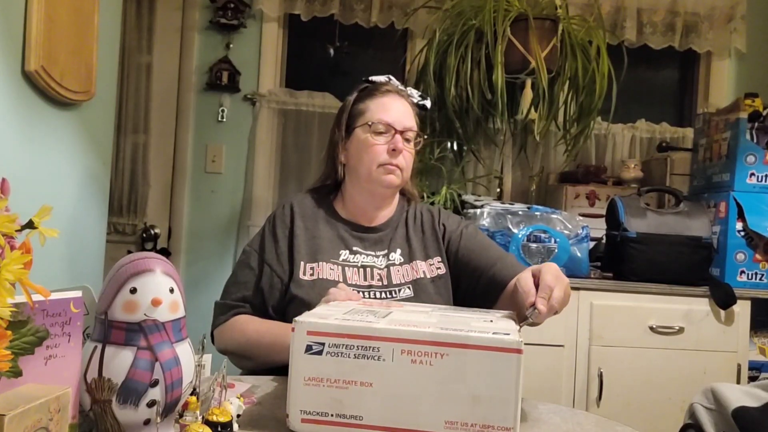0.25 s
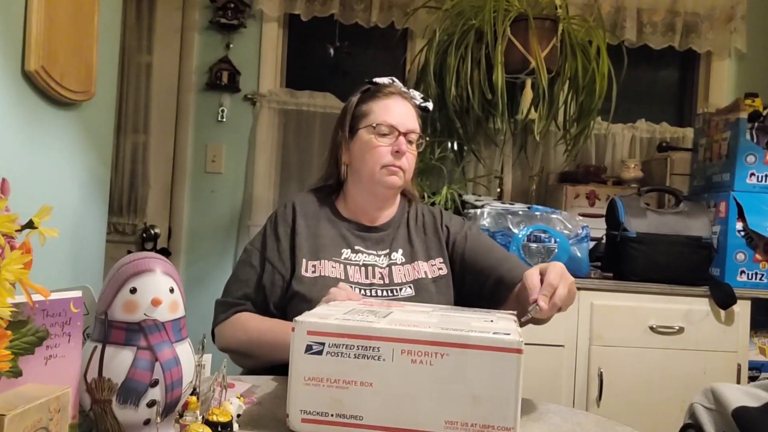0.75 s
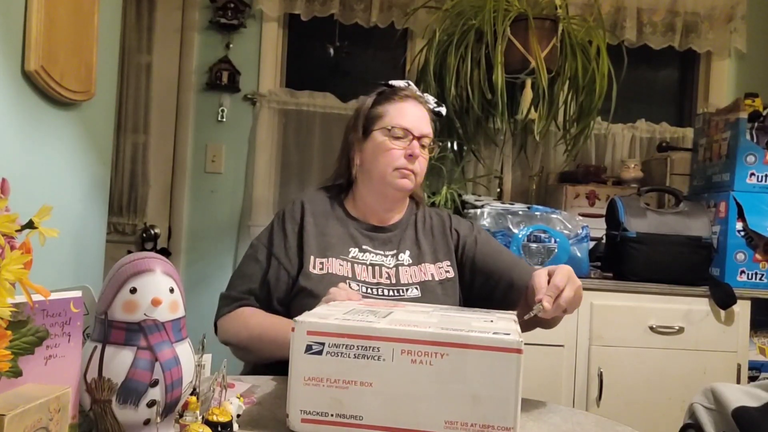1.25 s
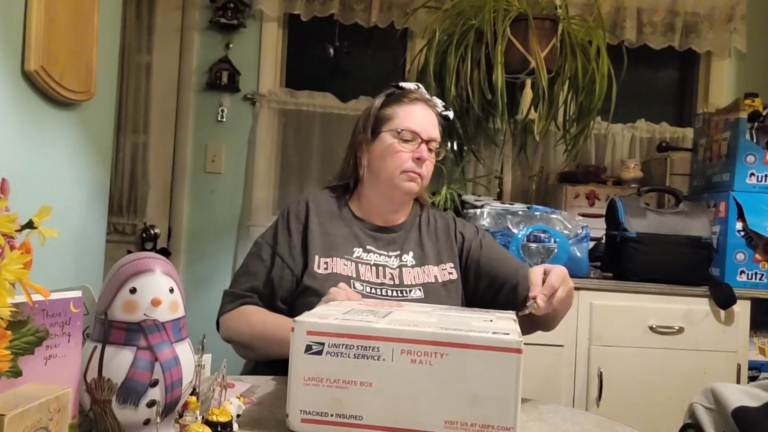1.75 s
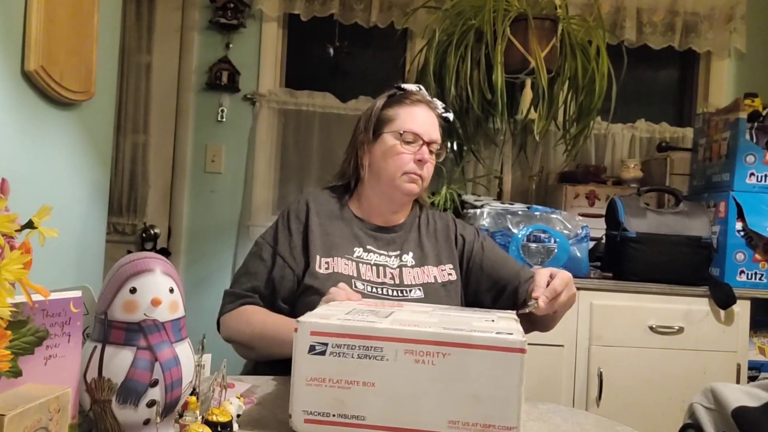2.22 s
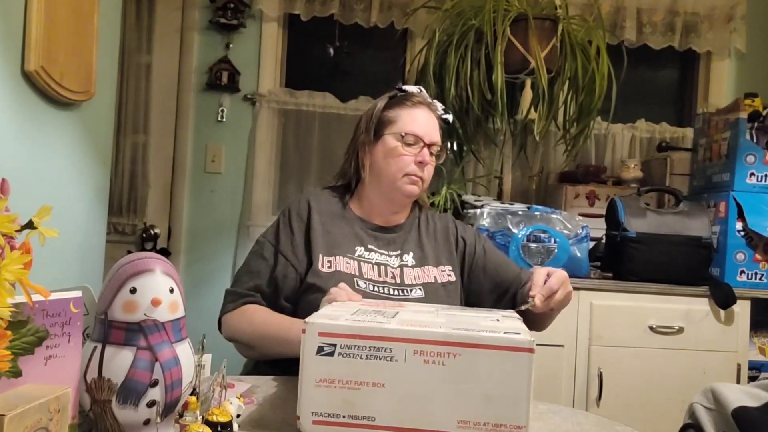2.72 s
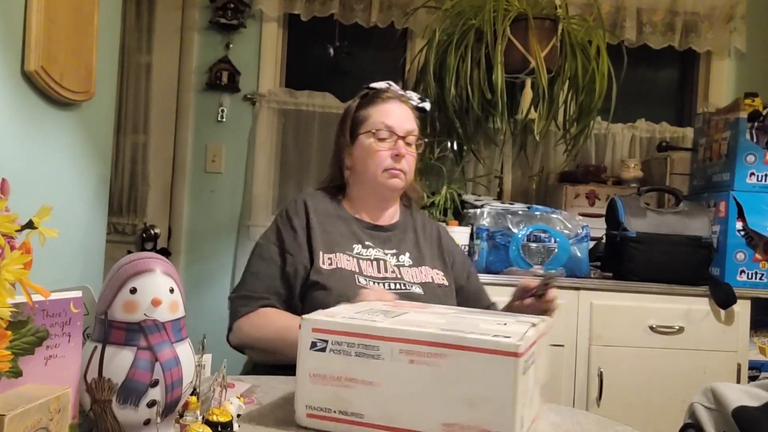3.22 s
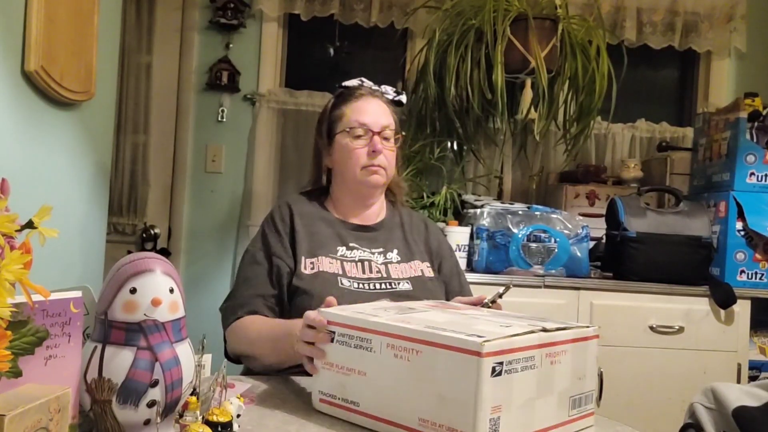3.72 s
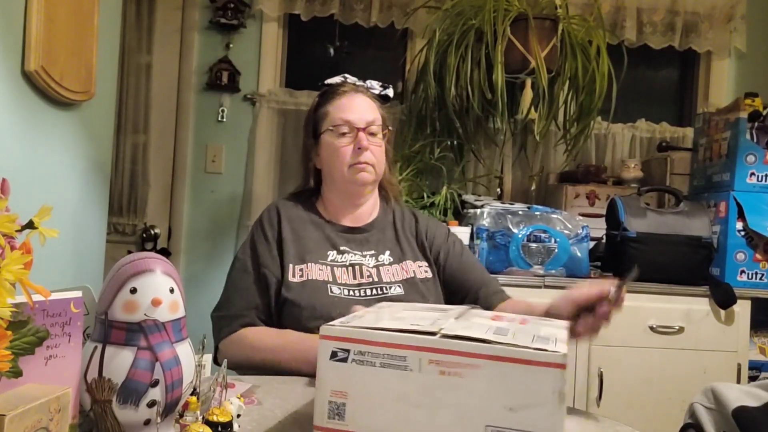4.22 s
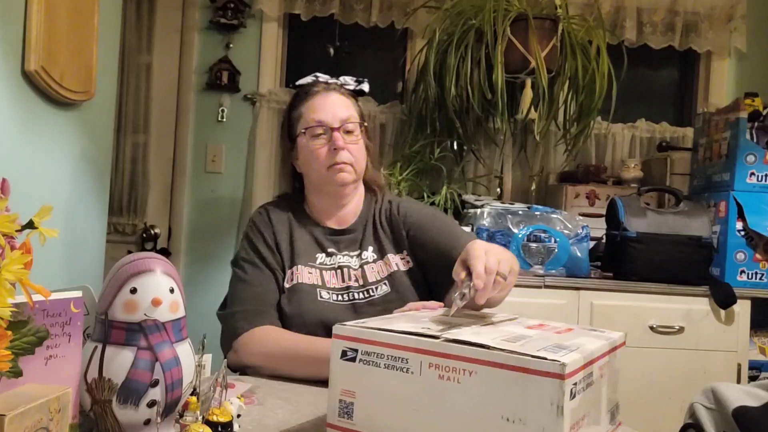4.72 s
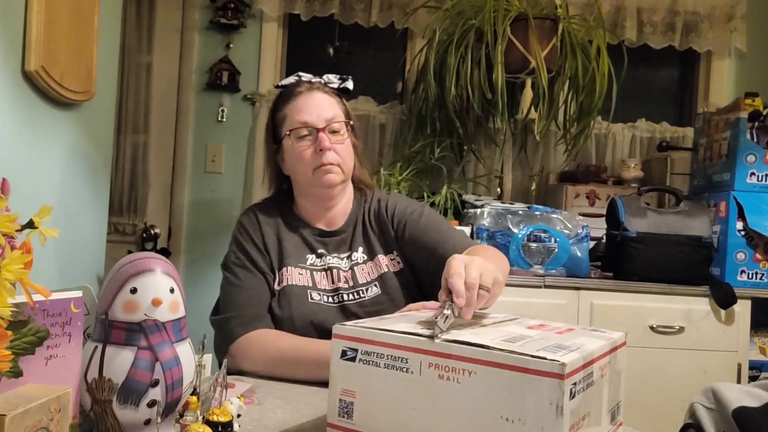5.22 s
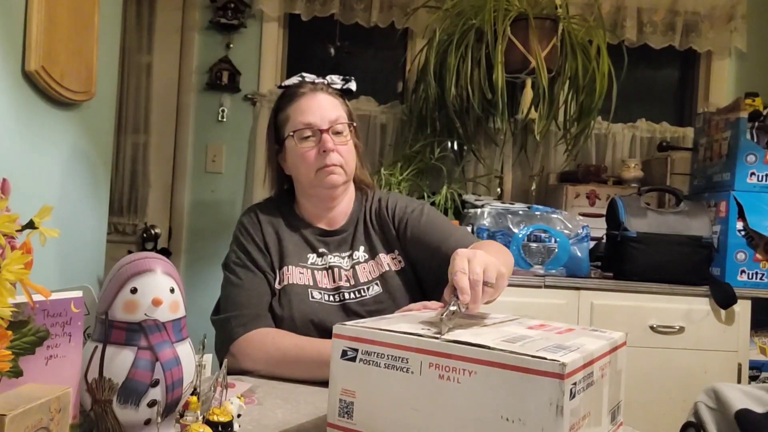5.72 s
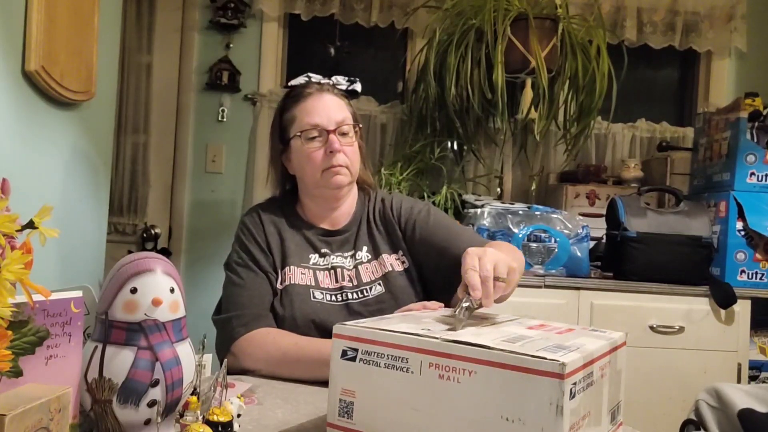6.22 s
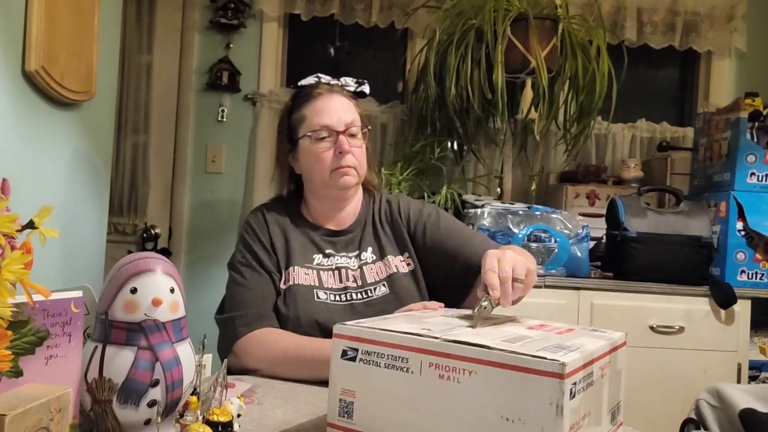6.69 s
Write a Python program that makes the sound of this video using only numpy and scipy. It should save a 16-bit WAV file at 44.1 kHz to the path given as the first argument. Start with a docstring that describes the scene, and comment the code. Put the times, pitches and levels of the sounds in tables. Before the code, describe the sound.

A small blade saws through packing tape on a hollow cardboard box, rasping and popping, then the box is turned and cut again more loudly.

```python
"""At a kitchen table a small blade saws through packing tape on a cardboard box, with a phone close by.
The blade drags, catches and slips over the flutes: noise drives ringing modes of the hollow box and its
board, and a coloured hiss is the tape. Between cuts the box slides on the table as scuffing noise and
knocks down on it as struck modes; a hand rubs a flap as noise around a moving note.
Kitchen echoes and a steady hush surround it, and the phone's suppressor turns quiet moments down."""
import sys
import numpy as np
from scipy import signal
from scipy.fft import rfft, irfft, next_fast_len
from scipy.io import wavfile
from scipy.ndimage import uniform_filter1d

SR = 44100
rng = np.random.default_rng(int(sys.argv[2]) if len(sys.argv) > 2 else 0)


def wav_record(signal):
    """Record a signal, one row per channel, as 16-bit PCM in the file named by sys.argv[1]."""
    frames = np.transpose(np.atleast_2d(signal))
    bounded = np.clip(frames, -1, 1)
    # unit amplitude maps onto the largest positive 16-bit level
    quanta = np.round(bounded * 32767).astype(np.int16)
    wavfile.write(sys.argv[1], SR, quanta)


N = 306495
T = np.arange(N) / SR
PAD = next_fast_len(N + SR)  # transform length, with room for tails
HZ = np.maximum(np.fft.rfftfreq(PAD, 1 / SR), 1)

# Modes of the air in the box: pitch_hz, width_hz, level_db
AIR_MODES = [(107.6, 24, -3), (128.8, 8.7, 15.5), (170, 64, -13)]
# Modes of the side walls: pitch_hz, width_hz, level_db
WALL_MODES = [(272.2, 21.9, 4), (297, 33.3, -2), (332.6, 33, -2.5), (396, 28.3, -3.5), (416, 36.6, -6.5),
              (472, 43, -11), (536.4, 35, -10.5), (647, 17, -12)]
# Modes of the board's flaps, low to high: pitch_hz, width_hz, level_db
BOARD_MODES = [(736, 113, 3), (856, 58, 7.5), (1080, 370, 3.5), (1150, 52, 7.5), (1224, 32, -1),
               (1342, 40, 7), (1437, 57, 4), (1766, 280, 0), (1970, 204, 1.5), (2212, 41, 0.5),
               (2360, 59, -2), (2548, 83, -2), (2850, 275, -6), (3415, 110, -5), (3635, 49, -1),
               (3920, 270, -6.5), (4680, 470, -10)]
# Mode of the table top: pitch_hz, width_hz, level_db
TABLE_MODES = [(64, 31, 0)]
# Spectrum of the tape hiss: pitch_hz, relative density (dB per Hz)
TAPE_COLOUR = [(2350, -20), (4000, -7), (4440, -5), (4790, -10.5), (5310, -3.5), (7660, -0.5), (9170, -7),
               (15100, 0.5), (16000, -48)]

CREST_DB = 5  # peak of a noise burst over its rms
MID_ONLY = np.array([[1], [0]])


def undb(db):
    """Turn dB into gain."""
    return 10 ** (np.asarray(db) / 20)


def through(x, response):
    """Filter x with a response scaled so that unit white noise keeps rms 1."""
    scale = np.sqrt(np.mean(abs(response) ** 2))
    return irfft(rfft(x, PAD) * response / scale, PAD)[..., :N]


def modes(table, neighbour=-1):
    """Sum ringing resonances; each is multiplied by neighbour once more than the one before."""
    response = 0
    for k, (hz, width_hz, db) in enumerate(table):
        resonance = 1 / (1 + 1j * (HZ - hz ** 2 / HZ) / width_hz)
        response = response + neighbour ** k * undb(db) * resonance
    return response


def colour(table):
    """Draw a spectrum through (Hz, dB) points, straight over log frequency."""
    hz, db = np.transpose(table)
    return undb(np.interp(np.log(HZ), np.log(hz), db))


def gains(tables):
    """Draw each column's dB as a gain over time, silent outside the tables."""
    out = 0
    for table in tables:
        s, *columns = np.transpose(table)
        out = out + np.array([undb(np.interp(T, s, db, left=-200, right=-200)) for db in columns])
    return out


def stroke(s, length_s, rise_s, t60_s):
    """Rise softly at s, hold for the length, then fade exponentially."""
    t = np.maximum(T - s, 0)
    rise = (1 - np.exp(-t / rise_s)) ** 2
    return rise * np.exp(-np.log(1000) * np.maximum(t - length_s, 0) / t60_s)


def burst(s, t60_s, rise_s):
    """Rise softly at s against an exponential fade that starts at once."""
    return stroke(s, 0, rise_s, t60_s)


def grit(scatter_db, grain_s):
    """Make mid and side noise that share uneven grains, as fibres and glue let go; rms 1."""
    k = max(int(grain_s * SR), 1)
    size = undb(scatter_db * np.repeat(rng.standard_normal(N // k + 1), k)[:N])
    size = uniform_filter1d(size, k)
    return rng.standard_normal((2, N)) * size / np.sqrt(np.mean(size ** 2))


def struck(pushes, table, neighbour=1):
    """Ring the modes after soft half-wave pushes (s, contact s, peak dB)."""
    size = SR // 3
    response = irfft(modes(table, neighbour), PAD)[:size]
    out = np.zeros(N + size)
    for s, contact_s, db in pushes:
        push = np.sin(np.pi * np.clip(T[:SR // 100] / contact_s, 0, 1)) ** 2
        ring = signal.fftconvolve(response, push)[:size]
        at = int(s * SR)
        out[at:at + size] += undb(db) * ring / abs(ring).max()
    return out[:N]


def patchy(x, spread_db, hold_s):
    """Swell narrow bands apart, as each bit of tape and board rings differently."""
    octaves, spectrum, out = np.log2(HZ), rfft(x, PAD), x
    k = int(hold_s * SR)
    for centre in np.arange(9.5, 13.3, 1 / 8):  # eighths of an octave
        band = irfft(spectrum * np.clip(1 - 8 * abs(octaves - centre), 0, 1), PAD)[:, :N]
        wander = np.repeat(rng.standard_normal(N // k + 1), k)[:N]
        swell = undb(spread_db * uniform_filter1d(wander, k))
        out = out + band * (swell - 1)
    return out


def hush():
    """Lay a steady coloured noise under the scene."""
    # Spectrum of the hush: pitch_hz, relative density (dB per Hz)
    hush_colour = [(24, -11), (40, 14.5), (185, 0), (297, 5.5), (392, -1.5), (585, -4), (1550, -9.5),
                   (7730, -10), (16000, -11)]
    return undb(-67.5) * through(rng.standard_normal((2, N)), colour(hush_colour))


def blade():
    """Drag and slip over the flutes, shaking the box's air, walls and flaps, the table and the tape."""
    # Strokes: start_s, length_s, rise_s, flap rasp level_db, change over the stroke (dB), then
    # table rumble, air boom, wall drum, cut edge and tape hiss (all dB re rasp)
    strokes = [(0.0, 1.05, 0.0062, -64.5, 2.5, 4.5, 6, 2.9, -3.5, 0.5),
               (1.132, .15, 0.0095, -59, 2.5, -4, 0.5, 6, -22, 2),
               (1.362, .14, 0.024, -56.5, -4.5, 2, 6, 5.3, -21, -3.5),
               (1.495, .36, 0.0065, -61, 8, -0.5, 5.5, 7.2, -16, -3),
               (1.987, 0.14, 0.0083, -55, -8.5, 8.5, 4.5, 10, -14, -2),
               (2.358, 0.13, 0.049, -67.5, -12, 22.5, 10, 27, 3, 15),
               (2.448, .22, 0.0037, -52.5, -1.5, -6, -2, 8.5, -3, -5.5),
               (2.72, 0.028, 0.005, -55.5, -1, 0, 17.5, 9.5, -8, -2.5),
               (5.541, 0.14, 0.0075, -61, 5.5, -21, -9.5, 6, 3.5, 1.5),
               (5.658, 0.741, 0.0055, -47, 0, -13.5, -1.5, 2.0, -15.5, -5),
               (6.416, .52, 0.0074, -47.5, -1, -12.5, -2.5, 3.9, -12, -6)]
    # Hand pressure, shaping the long cuts: time_s, level_db
    pressure_points = [(2.49, 0.5), (2.58, 6.5), (2.68, 1), (5.67, -1.5), (5.8, -1), (5.974, 3.5),
                       (6.11, -3), (6.298, -3.5), (6.34, 1.5), (6.416, -3.5), (6.444, -1), (6.6, -2),
                       (6.866, 1.5), (6.95, 5)]
    # Lurches of the box under the hand: centre_s, air boom level_db, wall drum level_db, half_length_s
    lurches = [(0.262, -50, -69, 0.092), (0.432, -47, -50.5, 0.06), (0.806, -42, -67, 0.024),
               (1.531, -38, -44.5, 0.013), (1.935, -37.5, -42.5, 0.023), (2.469, -34, -36.5, 0.015),
               (2.545, -58, -37.5, 0.039), (2.642, -48, -46, .02), (2.89, -39, -51.5, 0.032),
               (5.812, -34, -33.5, 0.017), (5.976, -38, -60, 0.034), (6.171, -39, -40.5, 0.031),
               (6.338, -59, -35.5, 0.033), (6.377, -49, -36, 0.014), (6.459, -63, -35.5, 0.033),
               (6.537, -52, -41, 0.071), (6.918, -37.5, -42, 0.04)]
    # Slips over a flute: time_s, tape hiss peak_db, wall drum level_db
    slips = [(0.0024, -36.5, -31), (0.073, -37.5, -36), (0.143, -36.5, -34), (0.208, -36.5, -34.5),
             (0.27, -34.5, -33.5), (0.334, -36, -37), (0.3954, -37, -35.5), (0.465, -36, -55),
             (0.516, -35, -30.5), (0.571, -37, -30), (0.637, -35.5, -38), (0.701, -37, -32),
             (0.762, -37, -36.5), (0.834, -36, -29), (0.906, -35, -37), (0.96, -34, -30), (1.025, -38, -33),
             (1.1727, -41.5, -58), (1.26, -41.5, -47), (1.528, -35, -30), (1.615, -40.5, -35),
             (1.703, -40.5, -27), (1.775, -41, -31.5), (1.8214, -37.5, -35), (2.046, -39.5, -51),
             (2.089, -43, -35.5), (2.455, -32.5, -26), (5.567, -38, -42), (5.745, -37, -26.5),
             (6.3225, -42, -39), (6.4457, -45, -40), (6.651, -37, -22.5)]
    stroke_t60_s, slip_t60_s, slip_rise_s = 0.21, 0.095, .007
    slip_lead_s = 0.0066  # the walls load up before the blade slips
    slip_rasp_db, slip_edge_db = -5, -2  # flap rasp re hiss peak; stiff cut edge re that rasp

    table = boom = drum = rasp = hiss = edge = slip_edge = slip_rasp = 0
    pressure = undb(np.interp(T, *np.transpose(pressure_points), left=0))
    for s, length_s, rise_s, rasp_db, change_db, table_db, boom_db, drum_db, edge_db, hiss_db in strokes:
        progress = np.clip((T - s) / length_s, 0, 1)
        drag = undb(rasp_db + change_db * progress) * pressure
        drag = drag * stroke(s, length_s, rise_s, stroke_t60_s)
        table = table + undb(table_db) * drag
        boom = boom + undb(boom_db) * drag
        drum = drum + undb(drum_db) * drag
        edge = edge + undb(edge_db) * drag
        rasp = rasp + drag
        hiss = hiss + undb(hiss_db) * drag
    for s, boom_db, drum_db, half_s in lurches:
        swell = np.exp(-((T - s) / half_s) ** 2)
        boom = np.hypot(boom, undb(boom_db) * swell)
        drum = np.hypot(drum, undb(drum_db) * swell)
    for s, hiss_db, drum_db in slips:
        push = burst(s - slip_rise_s, slip_t60_s, slip_rise_s)
        early_push = np.roll(push, -int(slip_lead_s * SR))
        drum = np.hypot(drum, undb(drum_db) * early_push)
        hiss = np.hypot(hiss, undb(hiss_db - CREST_DB) * push)
        slip_rasp = slip_rasp + undb(hiss_db + slip_rasp_db) * push
        slip_edge = slip_edge + undb(hiss_db + slip_rasp_db + slip_edge_db) * push

    box = through(boom * grit(1.2, 0.0032), modes(AIR_MODES))
    box = box + through(drum * grit(2.25, .004), modes(WALL_MODES))
    box = box + through(table * grit(0.63, 0.0092), modes(TABLE_MODES))
    # The stiff cut edge rings the top modes of the board.
    board = through(rasp * grit(3.1, .003), modes(BOARD_MODES))
    board = board + through(edge * grit(1.3, 0.0057), modes(BOARD_MODES[-7:]))
    board = board + through(slip_edge * grit(1.4, 0.0079), modes(BOARD_MODES[-5:]))
    board = board + through(slip_rasp * grit(1.7, .003), modes(BOARD_MODES[:8]))
    tape = through(hiss * grit(2.0, 0.0027), colour(TAPE_COLOUR))
    return box + patchy(board + tape, 2.87, .035)


def catches():
    """Catch on a flute and jerk free: each jerk rings the walls and crackles in the flaps."""
    # Jerks: time_s, wall peak_db, crackle level_db
    jerks = [(1.786, -37, -49), (1.824, -37, -56), (2.463, -33, -58), (5.745, -35.5, -53),
             (5.862, -26.5, -57), (5.951, -29.5, -44), (6.121, -32, -53), (6.389, -27, -43),
             (6.458, -31, -46), (6.482, -31.5, -51), (6.545, -40, -39)]
    contact_s, t60_s = .001, 0.054
    ring = struck([(s, contact_s, wall_db) for s, wall_db, _ in jerks], WALL_MODES)
    crackle = sum(undb(db) * burst(s, t60_s, .0007) for s, _, db in jerks)
    return ring * MID_ONLY + through(crackle * grit(3.0, 0.0014), modes(BOARD_MODES))


def knocks():
    """Knock the box on the table: edge cracks and scuffs, then the body rings air, walls and table."""
    # Knocks, last the blade's stab: time_s, air boom peak_db, wall level_db (its peak is CREST_DB higher),
    # crack level_db, corner peak_db, scuff level_db, body contact_s
    knock_table = [(1.936, -33.5, -58, -50, -60, -56.5, 0.0019), (2, -39, -39.5, -53, -60, -69, 0.0018),
                   (2.888, -28, -42, -48.5, -67.5, -49.5, 0.002),
                   (3.709, -42.5, -34, -56, -39, -49, 0.0019), (3.749, -49, -44, -64, -65, -67, 0.002),
                   (4.477, -49, -45, -78, -65, -62, 0.0053), (5.678, -44, -28, -41.5, -55, -36.5, 0.0008)]
    # Mode of a stiff corner that clacks: pitch_hz, width_hz, level_db
    corner_modes = [(1674, 120, 0)]
    body_lag_s = 0.00198  # the body lands just after the edge
    table_db = -3  # table top re air boom
    s, boom_db, wall_db, crack_db, corner_db, scuff_db, contact_s = np.transpose(knock_table)
    body = s + body_lag_s
    ring = struck(zip(body, contact_s, boom_db), AIR_MODES, -1.2)
    ring = ring + struck(zip(body, contact_s, wall_db + CREST_DB), WALL_MODES)
    ring = ring + struck(zip(s, contact_s / 5, crack_db + CREST_DB), BOARD_MODES)
    ring = ring + struck(zip(body, contact_s / 8, corner_db), corner_modes)
    ring = ring + struck(zip(body, contact_s, boom_db + table_db), TABLE_MODES)
    crack = sum(undb(db) * burst(at, 0.21, c / 2) for at, db, c in zip(s, crack_db, contact_s))
    scuff = sum(undb(db) * burst(at, 0.17, c / 8) for at, db, c in zip(s, scuff_db, contact_s))
    crack = through(crack * grit(3.0, 0.0036), modes(BOARD_MODES))
    scuff = through(scuff * grit(1.0, 0.003), colour(TAPE_COLOUR))
    return ring * MID_ONLY + crack + scuff


def sliding():
    """Rub the box's bottom on the table: judders, rustling flaps, a scuff and finer hiss, small ticks."""
    # Slides, one table each: time_s, scuff level_db, bright hiss (dB re scuff)
    slides = [
        [(3.03, -86, 8), (3.096, -61, -0.5), (3.314, -56, 2.5), (3.442, -56, -1), (3.534, -72, -24),
         (3.68, -88, -7)],
        [(3.76, -73, 8), (3.828, -64, 0.5), (3.99, -58, 5.5), (4.19, -60.5, 4.5), (4.328, -60, -3),
         (4.36, -60, 4.5), (4.438, -69, -14), (4.476, -60.5, -1), (4.646, -64.5, -1), (4.854, -62, -4),
         (4.976, -67.5, 2), (5.22, -68, -10), (5.36, -83, -5)],
    ]
    # Judders as the bottom catches: start_s, length_s, then level_db of table rumble, air boom,
    # wall drum and flap rustle
    judders = [(2.901, 0.13, -66, -52, -63, -97), (3.324, 0.15, -72, -76, -65, -71.5),
               (3.717, 0.086, -49.5, -54, -57, -66), (4.086, 0.21, -73, -72, -65.5, -71.5),
               (4.317, 0.066, -67, -62, -57, -69), (4.447, 0.031, -51, -62, -54.5, -65),
               (4.503, 0.028, -55, -62, -67, -85), (4.747, 0.16, -83, -74, -69.5, -68),
               (4.838, .01, -81, -75, -77, -65), (4.939, 0.034, -63, -59, -60, -75),
               (5.005, 0.033, -57, -69, -73, -67), (5.052, 0.19, -84, -75, -72, -68),
               (5.44, 0.028, -89, -69, -64.5, -67)]
    # Ticks of tape and blade: time_s, scuff peak_db, bright hiss level_db, fade t60_s, rise_s
    ticks = [(3.767, -46.5, -46, 0.14, 0.0032), (4.162, -42.5, -47, 0.29, 0.0035),
             (4.657, -54, -51.5, 0.41, 0.0019), (4.856, -52.5, -58.5, 0.27, .001),
             (5.135, -48.5, -53, 0.13, .002), (5.463, -48, -49, 0.12, 0.0004),
             (5.667, -37, -40, 0.03, 0.00099)]
    # Spectrum of the scuff and its hiss: pitch_hz, relative density (dB per Hz)
    scuff_colour = [(710, -64), (1200, -2), (2620, 3), (5020, 4), (5410, 2.5), (5840, 2.5), (7570, 3),
                    (8820, -9.5), (14800, -3.5), (16000, -11)]
    judder_rise_s, judder_t60_s = 0.0066, 0.14
    bright_hz, rustle_hz = 8000, 980  # scuff gives way to bright hiss; the rustle is duller above

    louder = [[(s, db, db + more_db) for s, db, more_db in slide] for slide in slides]
    scuff, bright = gains(louder)
    table = boom = drum = rustle = 0
    for s, length_s, table_db, boom_db, drum_db, rustle_db in judders:
        judder = stroke(s, length_s, judder_rise_s, judder_t60_s)
        table = table + undb(table_db) * judder
        boom = boom + undb(boom_db) * judder
        drum = drum + undb(drum_db) * judder
        rustle = rustle + undb(rustle_db) * judder
    for s, scuff_db, bright_db, t60_s, rise_s in ticks:
        tick = burst(s - rise_s, t60_s, rise_s)
        scuff = np.hypot(scuff, undb(scuff_db - CREST_DB) * tick)
        bright = np.hypot(bright, undb(bright_db) * tick)

    box = through(drum * grit(5.0, 0.0059), modes(AIR_MODES[-1:] + WALL_MODES))
    box = box + through(boom * grit(2.2, 0.0052), modes(AIR_MODES))
    dull_flaps = modes(WALL_MODES[-2:] + BOARD_MODES) / (1 + (HZ / rustle_hz) ** 4)
    box = box + through(rustle * grit(1.3, 0.0038), dull_flaps)
    box = box + through(table * grit(1.0, 0.005), modes(TABLE_MODES))
    bright_share = 1 / (1 + (bright_hz / HZ) ** 8)
    rub = through(scuff * grit(0.44, 0.0021), colour(scuff_colour) * (1 - bright_share))
    return box + rub + through(bright * grit(1.5, 0.0012), colour(scuff_colour) * bright_share)


def finest_hiss():
    """Swell the very top of the hiss once, as noise above a steep low cut."""
    centre_s, half_s, level_db, low_cut_hz = 4.01, .07, -56, 13000
    swell = undb(level_db) * np.exp(-((T - centre_s) / half_s) ** 2)
    return through(swell * grit(1.5, .001), 1 / (1 + (low_cut_hz / HZ) ** 12))


def ringing_tick():
    """Tick once with a ring: a short gritty burst drives two broad modes."""
    # Modes of the ring: pitch_hz, width_hz, level_db
    ping_modes = [(2570, 400, -1), (5360, 260, 2.5)]
    start_s, level_db, t60_s, rise_s = 4.166, -45.5, 0.14, 0.0018
    tick = undb(level_db) * burst(start_s, t60_s, rise_s)
    return through(tick * grit(1.5, .002), modes(ping_modes))


def flap_rub():
    """Rub a flap by hand: slow noise rides a carrier, a narrow band whose note leaps up and wavers."""
    # Rub: time_s, level_db, pitch_hz
    rub_points = [(4.95, -70, 433), (4.975, -65, 433), (5.01, -60, 460), (5.03, -62, 798),
                  (5.052, -58.5, 761), (5.11, -60.5, 713), (5.152, -61, 750), (5.19, -67, 750)]
    width_hz = 130
    s, _, pitch_hz = np.transpose(rub_points)
    level = gains([[(at, db) for at, db, _ in rub_points]])[0]
    phase = 2 * np.pi * np.cumsum(np.interp(T, s, pitch_hz)) / SR
    low_pass = 1 / (1 + 2j * HZ / width_hz)
    in_phase = through(grit(1.7, .004), low_pass)
    quadrature = through(grit(1.7, .004), low_pass)
    return level * (in_phase * np.cos(phase) + quadrature * np.sin(phase))


def room(x):
    """Add kitchen echoes: a fading spray of reflections, separate for mid and side."""
    t60_s, level_db, gap_s = .3, -13, .004
    t = T[:SR // 2]
    fade = np.exp(-np.log(1000) * t / t60_s) * (t > gap_s)
    spray = rng.standard_normal((2, len(t))) * fade
    spray = spray / np.sqrt(np.sum(spray ** 2, axis=1, keepdims=True))
    return x + undb(level_db) * signal.fftconvolve(x, spray, axes=1)[:, :N]


def scene():
    """Mix all sources as mid and side, set the width over frequency and turn them into left and right."""
    # Stereo width: pitch_hz, side gain (dB)
    width = [(60, -6), (110, -13.5), (200, -18.5), (380, -10.5), (700, -4), (1290, -2.5), (2380, -1),
             (4400, 0), (8120, 0.5), (15000, -1.5)]
    lag_share = .2  # power share of the side that comes from the lag between the two ports
    sources = blade() + catches() + knocks() + sliding() + finest_hiss() + ringing_tick() + flap_rub()
    mid, side = rfft(room(sources) + hush(), PAD)
    lagged = 1j * mid  # the mid turned a quarter cycle
    side = (np.sqrt(1 - lag_share) * side + np.sqrt(lag_share) * lagged) * colour(width)
    return irfft(np.array([mid + side, mid - side]), PAD)[:, :N]


def record(dry):
    """Turn quiet moments down as the phone's suppressor does, then cut bass and top."""
    threshold_db, floor_db, memory_s = -62.5, -35, 0.057
    bass_hz, top_hz = 41.3, 15750
    keep = np.exp(-1 / (memory_s * SR))
    power = np.mean(dry ** 2, axis=0)
    power = signal.lfilter([1 - keep], [1, -keep], power, zi=[undb(threshold_db)])[0]
    gain = power / (power + undb(2 * threshold_db))  # twice the dB, as this is power
    dry = dry * np.maximum(gain, undb(floor_db))
    dry = signal.sosfilt(signal.butter(2, bass_hz, "high", fs=SR, output="sos"), dry)
    return signal.sosfilt(signal.ellip(10, .2, 70, top_hz, fs=SR, output="sos"), dry)


dry = scene()
out = record(dry)
wav_record(out)
```